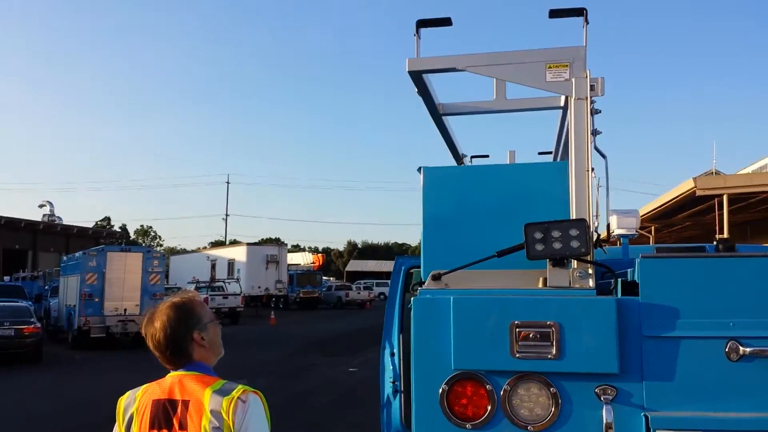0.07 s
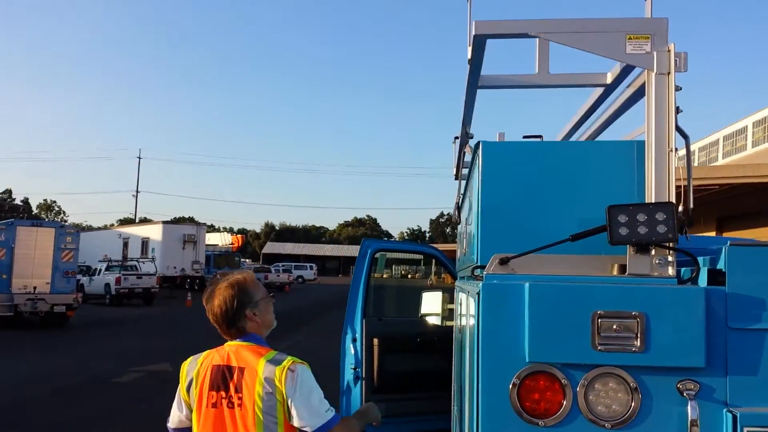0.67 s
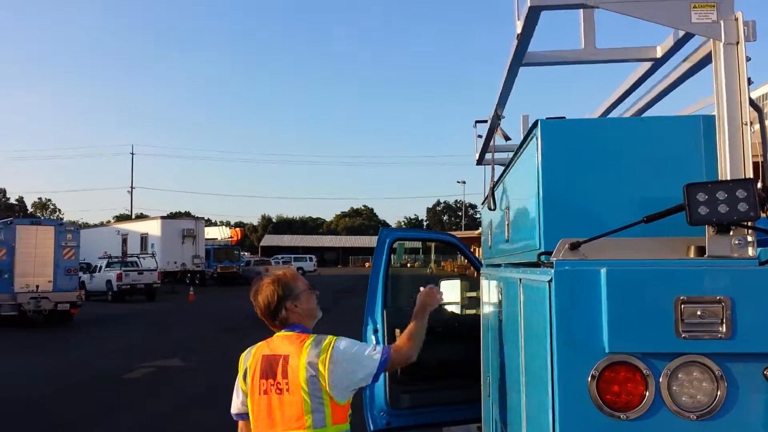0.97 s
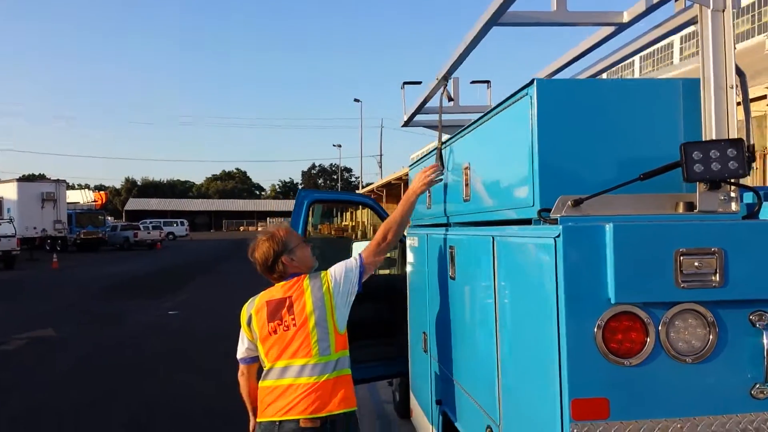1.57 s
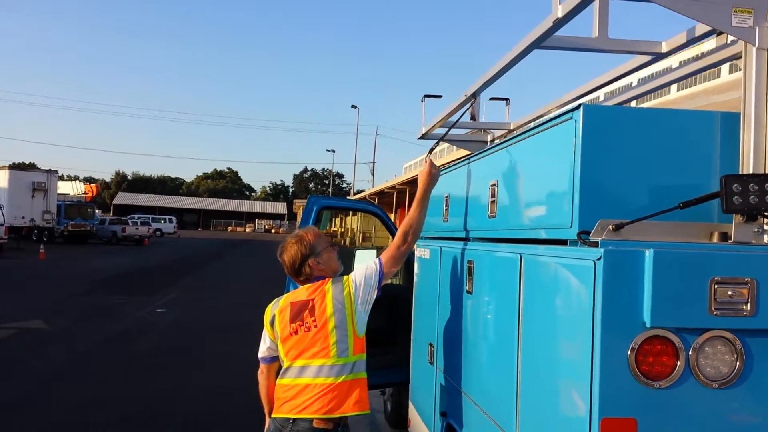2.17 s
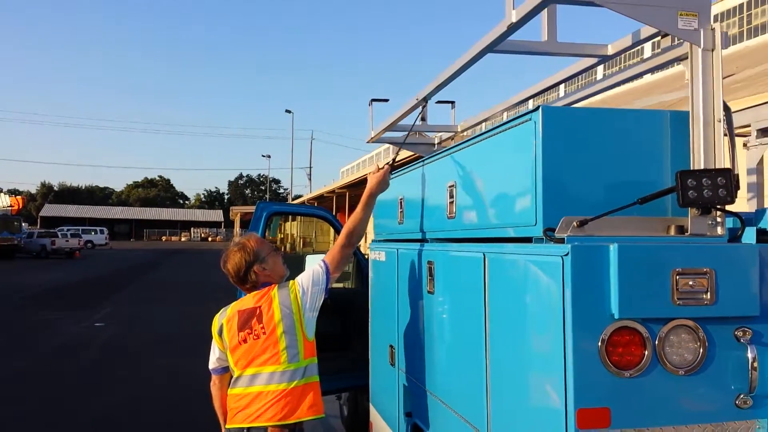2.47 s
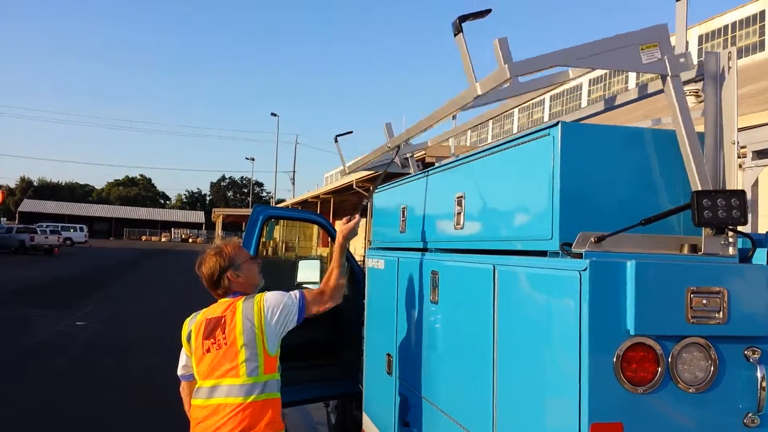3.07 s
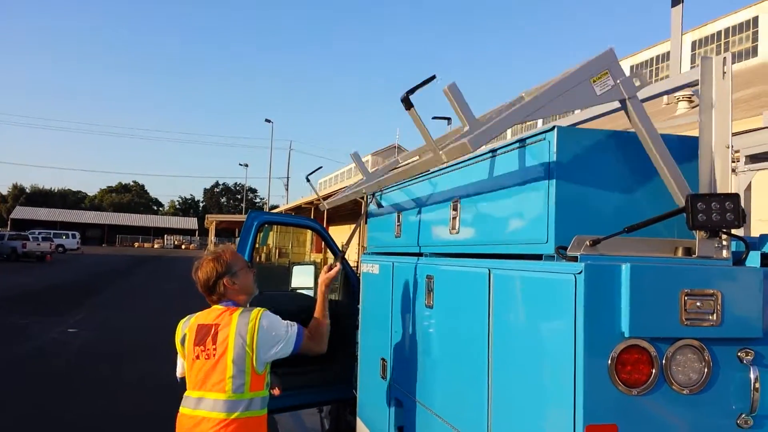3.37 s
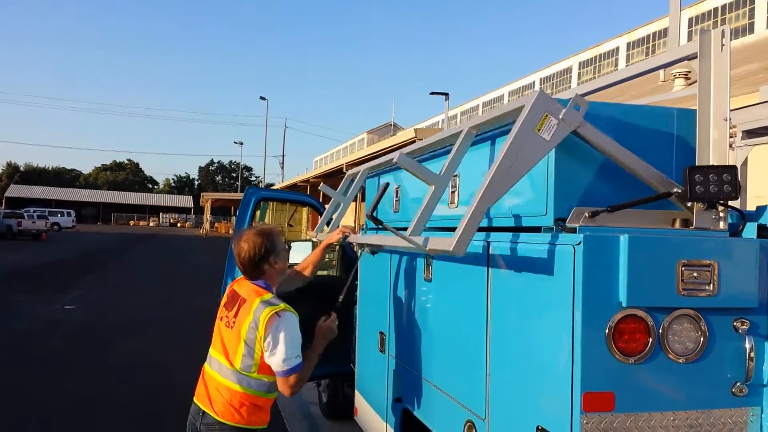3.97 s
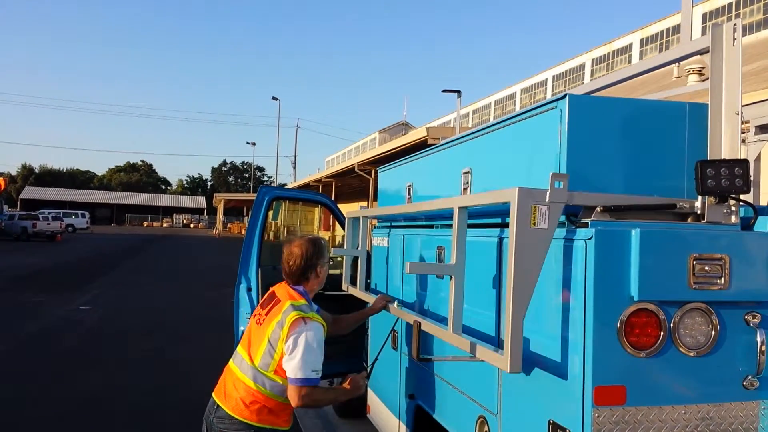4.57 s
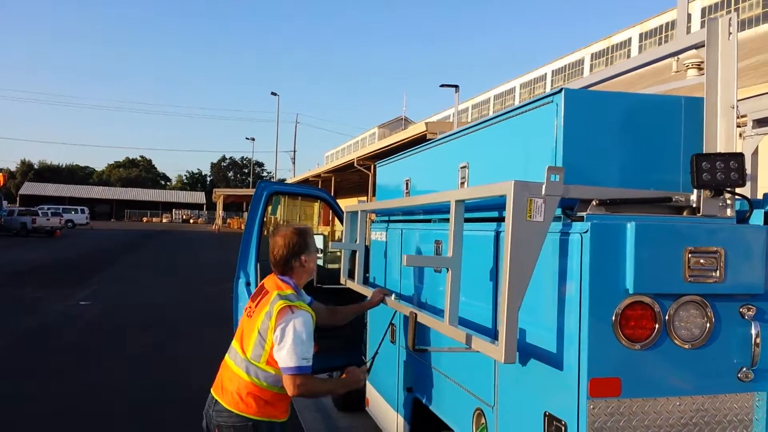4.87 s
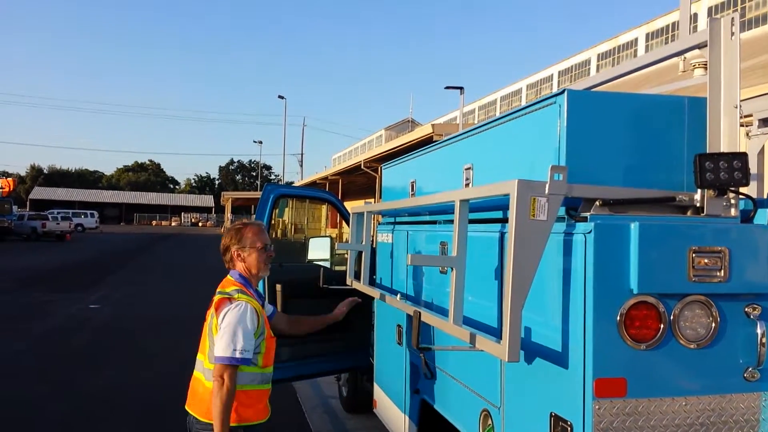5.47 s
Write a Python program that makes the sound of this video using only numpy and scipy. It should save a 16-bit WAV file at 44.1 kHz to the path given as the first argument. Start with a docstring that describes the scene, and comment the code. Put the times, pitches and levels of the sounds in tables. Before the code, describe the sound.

Distant engines and traffic rumble and hiss steadily across an open lot, growing slightly louder toward the middle. For the first two seconds, low puffs of wind buffet the microphone, first on the left, then shifting between sides. Nearby, the latch of a truck's metal ladder rack is worked: light, high ticks and dry scrapes come at about 0.3, 1.1 and 1.3 seconds, a small grating cluster at 1.8, and another tick at 2.3. At 2.9 seconds the arms break free with the loudest sound, a bright rattle with a scrape and a short, hollow clang. A stop clacks with a brief buzzing ring near 3.2 seconds, and a small tick follows at 3.4. The rack swings down with a faint rumble around 4 seconds. A faint machine whine rises by 3.5 seconds and slowly fades under the traffic, with one soft wind puff near 5 seconds.

```python
"""Lowering a truck's ladder rack

A drop-down aluminium ladder rack is pulled off the roof of a truck in an open lot. Its latch ticks
and scrapes, the arms break free with a rattle that shakes the frame, and a stop clacks before the
rack glides down. Engines and traffic drone all around, a machine whines across the lot, and a few
puffs of wind hit the microphone's two openings."""
import sys
import numpy as np
from scipy import signal
from scipy.fft import rfft, irfft, next_fast_len
from scipy.io import wavfile
from scipy.ndimage import uniform_filter1d, map_coordinates

SR = 44100
rng = np.random.default_rng(int(sys.argv[2]) if len(sys.argv) > 2 else 0)


def int16_out(signal):
    """Quantize to a 16-bit WAV file."""
    q = np.round(np.clip(np.atleast_2d(signal).T, -1, 1) * 32767)
    wavfile.write(sys.argv[1], SR, q.astype(np.int16))


N = 251811
SIZE = next_fast_len(N, real=True)
T = np.arange(N) / SR
HZ = np.maximum(np.arange(SIZE // 2 + 1) * SR / SIZE, 1)
BREAK_FREE_S = 2.904  # when the arms come loose

# A fade time (t60) is how long a sound takes to drop 60 dB. A balance is left level minus right level.
# Metal hitting metal. Each row: time in seconds, strength in dB, fade time in seconds, ping pitch in Hz,
# then ping level, balance, thud level, snap level and knock level, all in dB.
HITS = [(0.338, -32, .008, 10400, -33, -2, -43, -35, -70), (0.349, -38, .02, 10700, -41, 0, -55, -46, -70),
        (1.093, -29, 0.014, 4900, -32, 16, -38, -37, -44),
        (1.3231, -33, .012, 6860, -28, -2, -27, -39, -20.5), (1.801, -35, .02, 5030, -32, 9, -42, -55, -60),
        (1.809, -30, 0.014, 4170, -27.5, 7, -32, -31.5, -48),
        (1.8295, -33, .012, 5450, -31, 3, -38, -36, -60), (1.8597, -30, .011, 7100, -22, -1, -29, -32, -42),
        (2.263, -31, .014, 9740, -34, -6, -43, -40, -70), (2.8972, -16, .018, 5850, -16, 10, -44, -55, -60),
        (2.904, -23, .008, 8500, -26, -4, -45, -36, -60),
        (2.9066, -13, .009, 7250, -15, -3, -34, -25.5, -55),
        (2.9097, -17, .012, 7400, -17, 0, -34, -40, -50), (2.9285, -24.5, .02, 5700, -27, 3, -30, -50, -42),
        (2.9402, -23, .022, 7650, -23, 1, -26, -44, -34), (2.998, -35, .008, 7700, -33, -6, -45, -50, -70),
        (3.067, -28, 0.014, 7300, -22, -7, -45, -46, -70),
        (3.426, -33, 0.0085, 3180, -34, -12, -33, -38, -50)]
# The tones of the stop's bracket. Each row: pitch in Hz, relative level in dB, fade time in seconds.
BRACKET_TONES = [(1955, -10.5, .1), (2010, -16, .09), (2410, -14, .1), (2940, -9.5, .06), (3480, -19, .08),
                 (5260, -18, .08), (6600, -15, .04), (7540, 3, .06), (7680, -10, .06), (8300, -6, .05),
                 (8950, -6, .035)]
# How alike the two sides sound. Each row: frequency in Hz, likeness from 0 (unrelated) to 1 (the same).
STEREO_LIKENESS = [(30, 0.77), (80, 0.87), (160, 0.97), (300, 1), (430, 0.78), (700, 0.86), (950, 0.4),
                   (1400, 0), (1900, 0.32), (2400, 0.44), (3200, 0), (15000, 0.22)]


def clacks():
    """Each hit cracks and snaps; the touching part pings, the body knocks, arms and bracket ring."""
    # The tones of the arms. Each row: pitch in Hz, relative level in dB, fade time in seconds.
    arm_tones = [(4260, -5, 0.14), (5243, -6, .2), (5707, -3, .16), (6000, 6, 0.26), (6480, -9, .12),
                 (7074, -15, 0.15), (7540, -12, .11)]
    # The tone colours of crack and snap. Each row: frequency in Hz, relative level in dB.
    crack_colour = [(300, -31), (1500, -21), (3300, -19), (4400, -4.5), (5700, 12), (7400, 1.5), (8800, 5),
                    (10200, -5), (11500, -33), (14000, -20), (15500, -28)]
    snap_colour = [(1000, -4), (3000, -2), (8000, -1), (11000, -2), (15000, -13)]
    clicks, pings, snap_power, crack_power = np.zeros((4, 2, N))
    crack_power += swell(BREAK_FREE_S, db=-25.5, rise=.008, t60=.11) ** 2  # the freed arms chatter
    for at, db, t60, hz, ping_db, balance_db, _, snap_db, knock_db in HITS:
        sides = pan(balance_db)
        crack_power += (swell(at, db, rise=.001, t60=t60) * sides) ** 2
        snap_power += (swell(at, snap_db, rise=.001, t60=.008) * sides) ** 2
        pings += ping(at, ping_db, hz, t60) * sides
        pings += ping(at, knock_db, hz=370, t60=.02)
        clicks[:, round(at * SR)] += from_db(db) * sides[:, 0]
    rings = from_db(-26) * (ringing(clicks, BRACKET_TONES) + ringing(clicks, arm_tones))
    crack = from_db(-1) * np.sqrt(crack_power) * noise(colour(crack_colour) * frame_boost(), alike=.087)
    snap = np.sqrt(snap_power) * noise(colour(snap_colour), alike=.14)
    return crack + snap + pings + rings


def stop(at=3.1645):
    """The stop is struck squarely and buzzes against its bracket, which roughens the ring."""
    # The tone colour of the stop's crack. Each row: frequency in Hz, relative level in dB.
    crack_colour = [(400, -12), (1200, -5), (2400, -3), (3600, -10), (5000, -2), (6500, 1), (8300, 2),
                    (10000, -7), (12000, -20), (13800, -15), (15000, -23)]
    click = np.zeros(N)
    click[round(at * SR)] = from_db(-19.5)
    crack = swell(at, db=-20, rise=.001, t60=.06) * noise(colour(crack_colour), alike=.093)
    buzz = ringing(click, BRACKET_TONES) * flutter(rate=600, depth_db=2.2)
    return pan(-3) * (buzz + crack)


def latch():
    """The latch rod grates in its guide as it is worked."""
    grating = swell(at=1.856, db=-37, rise=.037, t60=.055) * flutter(rate=300, depth_db=3.5)
    return grating * noise(resonance(hz=2100, width=900) ** 2, alike=.51)


def scrapes():
    """Dry joints slide in tiny uneven slips that make the arms sing."""
    # The slides of the joints. Each row: loudest moment in seconds, level in dB.
    slides = [(0.16, -38), (1.828, -36), (2.255, -37), (2.78, -35), (2.92, -28.5), (2.945, -36),
              (3.067, -29.5)]
    # The tone colour of sliding metal. Each row: frequency in Hz, relative level in dB.
    slide_colour = [(300, -29), (2000, -7), (3700, -2.5), (4400, 4.5), (5500, 8.5), (6800, -3.5),
                    (7700, -1.5), (9000, -4), (11000, -13), (13000, -12), (14500, -22)]
    pressure = np.sqrt(sum(swell(at, db, rise=.016, t60=.28) ** 2 for at, db in slides))
    slips = flutter(rate=460, depth_db=-.5)
    return pressure * slips * noise(colour(slide_colour) * frame_boost(), alike=.15)


def frame():
    """The long tubes thud at each hit, shudder as the arms break free and rumble as they swing down."""
    # The frame's deep tone colour. Each row: frequency in Hz, relative level in dB.
    frame_colour = [(120, -28), (250, 8.5), (450, 6.5), (650, 6.5), (1100, 2), (2200, -2.5), (3200, -7),
                    (5000, -11), (12000, -41)]
    thuds = sum(swell(at, thud_db, rise=.0032, t60=.047) ** 2 for at, *_, thud_db, _, _ in HITS)
    shudder = swell(BREAK_FREE_S + .019, db=-33, rise=.012, t60=.39) ** 2
    swing = swell(at=4, db=-40, rise=.087, t60=.7) ** 2
    rumble = noise(colour(frame_colour) * frame_boost(), at_hz(STEREO_LIKENESS))
    return np.sqrt(thuds + shudder + swing) * rumble


def frame_boost():
    """The frame and its arms strengthen the frequencies at which they like to vibrate."""
    # The frame's resonances. Each row: pitch in Hz, width in Hz, added strength in dB.
    peaks = [(260, 83, 6), (604, 25, 2), (1120, 150, -4), (2050, 200, 2), (3840, 34, -2), (4240, 69, -10),
             (5000, 79, 0), (5630, 46, -11), (5922, 31, -1), (6470, 43, 6), (7120, 120, 15),
             (7600, 200, 13.5), (7950, 230, 4)]
    return 1 + bands(peaks)


def tubes():
    """The jolt of breaking free sets the hollow tubes ringing in a low, short clang."""
    # The tones of the tubes. Each row: pitch in Hz, relative level in dB, fade time in seconds.
    tones = [(252, -8, .7), (309, -5, .6), (620, 0, .35), (1050, -8, .15), (1135, -6, .17), (1863, -9, .22),
             (2480, -12, .2)]
    return sum(swell(BREAK_FREE_S + .026, db - 31.5, rise=.015, t60=t60) * np.sin(2 * np.pi * hz * T)
               for hz, db, t60 in tones)


def truck_echo(rack, delay_s=.007):
    """The flat side of the truck throws the rack's sound back, a little later on the right."""
    late = [np.interp(T - delay_s * stretch, T, side, left=0) for side, stretch in zip(rack, (1, 1.3))]
    return from_db(-11) * np.array(late)


def wind():
    """Each puff buffets the two microphone openings separately; longer puffs build more slowly."""
    # The puffs. Each row: peak time in seconds, level in dB, fade time in seconds, balance in dB.
    puffs = [(0.02, -16.5, 0.35, -24), (0.28, -26, 0.43, -4), (0.506, -16, 0.16, -26),
             (0.546, -15, 0.17, -14), (0.618, -20.5, 0.16, -3), (0.71, -23.5, 0.31, -5),
             (0.96, -27.5, 0.28, 17), (1.097, -21, 0.17, 11), (1.206, -21, 0.084, 29),
             (1.35, -28.5, 0.74, -5), (1.68, -29, 0.57, -19), (5.07, -31.5, 0.7, 20)]
    # The tone colour of swirling air. Each row: frequency in Hz, relative level in dB.
    wind_colour = [(15, -34), (35, -8), (70, -3.5), (105, -3), (170, -10.5), (260, -30.5), (500, -35.5),
                   (2000, -77)]
    power = sum((swell(at, db, rise=.0088 + .088 * t60, t60=t60) * pan(balance_db)) ** 2
                for at, db, t60, balance_db in puffs)
    swirls = noise(colour(wind_colour), alike=0)
    even_swirls = swirls / np.sqrt(uniform_filter1d(swirls ** 2, size=2000, axis=1))
    return np.sqrt(power) * even_swirls


def traffic(split_hz=1200):
    """Distant engines rumble and drone under the roar and hiss of traffic."""
    # The tone colours of rumble, roar and hiss. Each row: frequency in Hz, relative level in dB.
    rumble_colour = [(12, -47), (20, -8), (70, 1), (114, 2.5), (134, 3), (157, -1), (187, -1), (276, -4.5),
                     (325, -15), (377, -15), (500, -23), (650, -37), (1100, -120)]
    roar_colour = [(240, -33), (400, -4), (494, -2.5), (622, 1.5), (701, -2.5), (812, 2), (874, -3.5),
                   (1060, -0.5), (1440, -4.5), (1620, -2), (2560, -7.5), (3190, -14.5), (3600, -19),
                   (4680, -30), (7920, -120)]
    hiss_colour = [(1880, -30), (3200, -5), (4090, -1.5), (5280, 3), (5720, 2.5), (6360, 3), (7110, 1.5),
                   (7960, 2), (9320, -3.5), (10200, -8.5), (12400, -14.5), (13300, -12), (14150, -8),
                   (14800, -14.5), (15500, -19)]
    # Engine drones and narrow bands of hiss. Each row: pitch in Hz, width in Hz, level in dB.
    drones = [(161.7, 7, -42.5), (288.7, 18, -53.5), (317.1, 9.6, -48.5), (350, 19, -54), (610, 6.9, -53),
              (667, 20, -55.5), (963, 7.1, -58.5), (2028, 120, -51.5)]
    hiss_bands = [(5390, 280, -52.5), (7860, 380, -51)]
    alike = at_hz(STEREO_LIKENESS)
    # The roar is split in two because the truck blocks its high part more.
    high_ratio = (HZ / split_hz) ** 6
    low_roar = colour(roar_colour) / np.hypot(1, high_ratio)
    out = from_db(-32.5) * flutter(rate=9, depth_db=-.5) * noise(colour(rumble_colour), alike)
    out += traffic_gain(-40, blocked_db=.8, surge_db=2) * noise(low_roar, alike)
    high_gain = traffic_gain(-39.5, blocked_db=3.5, surge_db=2) * flutter(rate=15, depth_db=1)
    out += high_gain * noise(low_roar * high_ratio, alike)
    hiss_gain = traffic_gain(-38.5, blocked_db=3, surge_db=.5) * flutter(rate=25, depth_db=1)
    out += hiss_gain * noise(colour(hiss_colour), alike)
    for hz, width, db in drones + hiss_bands:
        out += from_db(db) * noise(resonance(hz, width) ** 2, alike)
    return out


def traffic_gain(open_db, blocked_db, surge_db, emerge_s=1.34, surge_s=3.09):
    """Traffic grows as the microphone is carried out from behind the truck, then swells once."""
    hidden = .5 - .5 * np.tanh((T - emerge_s) / .87)
    surge = np.exp(-((T - surge_s) / .57) ** 2)
    return from_db(open_db - blocked_db * hidden + surge_db * surge)


def lot_echoes(sound):
    """Ground, truck and wall reflect the traffic; some delays shift as the microphone moves."""
    # The echoes. Each row: starting delay in seconds, final delay in seconds, relative level in dB.
    echoes = [(.0021, 0.00166, -24), (.0056, 0.0056, -22), (0.0111, .0101, -17), (0.0181, .0181, -19)]
    out = sound.copy()
    for first, last, db in echoes:
        delay = np.linspace(first, last, N)
        for side, stretch in enumerate((1, 1.04)):  # a little later on the right
            out[side] += from_db(db) * map_coordinates(sound[side], [(T - delay * stretch) * SR], order=3)
    return out / np.sqrt(1 + sum(from_db(db) ** 2 for _, _, db in echoes))


def machine_whine(peak_s=3.5, peak_db=-46, rise_db_per_s=15, fall_db_per_s=2.9):
    """A machine across the lot whines in narrow, unsteady bands that come up and slowly fade."""
    # The bands of the whine. Each row: pitch in Hz, width in Hz, relative level in dB.
    peaks = [(1584, 42, 0), (1678, 50, -5), (1880, 90, -10), (2510, 80, -11)]
    age = T - peak_s
    db = peak_db + np.minimum(rise_db_per_s * age, -fall_db_per_s * age)
    return from_db(db) * noise(bands(peaks), alike=.65)


def from_db(db):
    """Turn decibels into a gain, the number a signal is multiplied by."""
    return 10 ** (np.asarray(db) / 20)


def at_hz(points):
    """Join a table's points into a curve with a value at every frequency."""
    hz, value = np.transpose(points)
    return np.interp(np.log(HZ), np.log(hz), value)


def colour(points):
    """Turn a tone colour table into a gain at every frequency."""
    return from_db(at_hz(points))


def resonance(hz, width):
    """A gain that is 1 at one pitch and falls away on both sides."""
    return 1 / np.hypot(1, (HZ / hz - hz / HZ) * hz / width)


def bands(peaks):
    """Several resonances added into one gain curve."""
    return sum(from_db(db) * resonance(hz, width) ** 2 for hz, width, db in peaks)


def pan(balance_db):
    """Left and right gains that keep the total power the same."""
    ratio = np.atleast_1d(from_db(balance_db))
    return np.array([ratio, np.ones_like(ratio)]) * np.sqrt(2 / (1 + ratio ** 2))


def noise(gain, alike):
    """Stereo noise of power 1, with a given tone colour and likeness between the sides."""
    shared, opposed = rng.standard_normal((2, 2 * len(HZ))).view(complex)
    spectrum = np.sqrt(1 + alike) * shared + np.sqrt(1 - alike) * opposed * [[1], [-1]]
    sound = irfft(gain * spectrum, SIZE)[:, :N]
    return sound / np.sqrt(np.mean(sound ** 2))


def flutter(rate, depth_db):
    """A gain that wanders around 1, heading for a new random value `rate` times a second."""
    points = depth_db * rng.standard_normal(N // 20)
    return from_db(np.interp(T * rate, np.arange(len(points)), points))


def swell(at, db, rise, t60):
    """A loudness curve that climbs to its peak at time `at` and dies away; times are in seconds."""
    out = np.zeros(N)
    heard = (T > at - 3 * rise) & (T < at + t60)
    age = T[heard] - at
    climb = (np.minimum(age, 0) / rise) ** 2
    fade = np.log(1000) * np.maximum(age, 0) / t60
    out[heard] = from_db(db) * np.exp(-climb - fade)
    return out


def ping(at, db, hz, t60):
    """A struck part rings at one pitch and dies away."""
    age = np.clip(T - at, 0, 2 * t60)
    return from_db(db) * np.exp(-np.log(1000) * age / t60) * np.sin(2 * np.pi * hz * age)


def ringing(clicks, tones):
    """Clicks set all the tones of one part ringing; neighbouring tones swing opposite ways."""
    out = np.zeros_like(clicks)
    for k, (hz, db, t60) in enumerate(tones):
        decay = np.exp(-np.log(1000) / (t60 * SR))
        step = 2 * np.pi * hz / SR
        tone = signal.lfilter([0, np.sin(step)], [1, -2 * decay * np.cos(step), decay ** 2], clicks + 1e-18)
        out += (-1) ** k * from_db(db) * tone
    return out


def scene():
    """The rack and its echo, over traffic, a machine and wind."""
    rack = latch() + clacks() + stop() + scrapes() + frame() + tubes()
    return rack + truck_echo(rack) + lot_echoes(traffic()) + machine_whine() + wind()


def record(dry, low_cut_hz=32, high_cut_hz=15400):
    """The microphone colours each side differently and cuts the deepest bass and highest treble."""
    # Its two openings resonate at different pitches. Each row: frequency in Hz, balance in dB.
    balance = [(40, 10), (90, -0.5), (250, 1.5), (700, 1), (1600, 0.5), (3000, -1), (6000, 0.5),
               (6700, -7.5), (7700, -22), (9000, -12), (12000, -10.5), (15000, -11)]
    coloured = irfft(rfft(dry, SIZE) * pan(at_hz(balance)), SIZE)[:, :N]
    thinned = signal.sosfilt(signal.butter(4, low_cut_hz, "high", fs=SR, output="sos"), coloured)
    return signal.sosfilt(signal.ellip(10, .3, 80, high_cut_hz, fs=SR, output="sos"), thinned)


dry = scene()
out = record(dry)
int16_out(out)
```